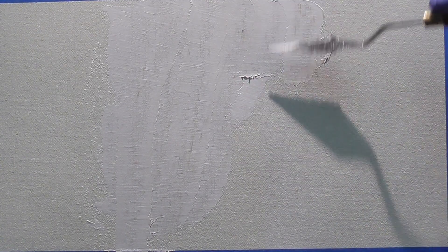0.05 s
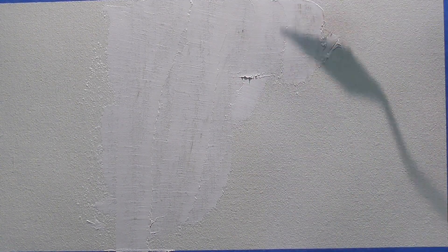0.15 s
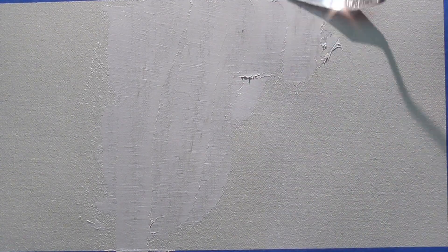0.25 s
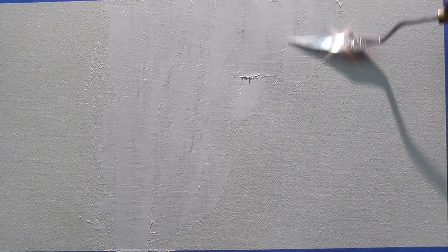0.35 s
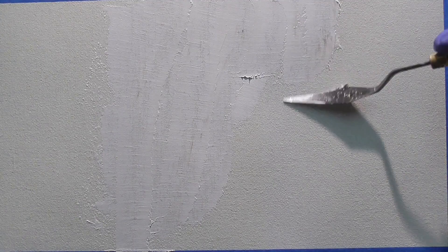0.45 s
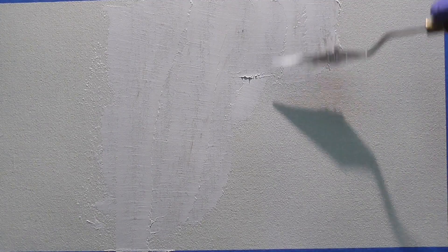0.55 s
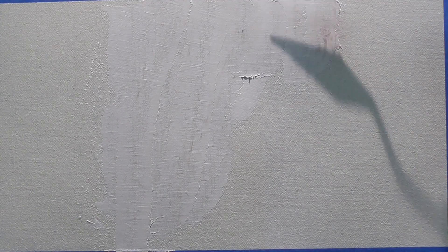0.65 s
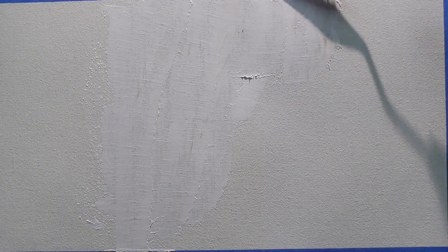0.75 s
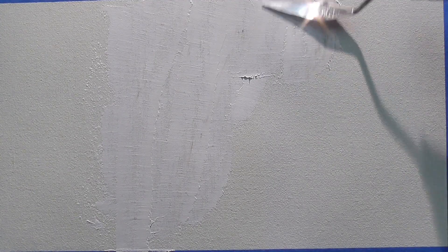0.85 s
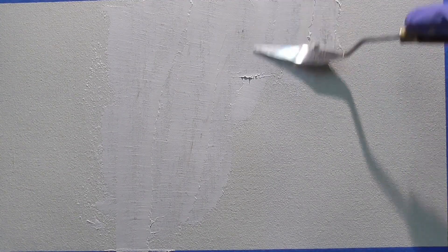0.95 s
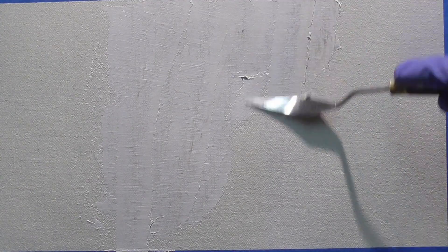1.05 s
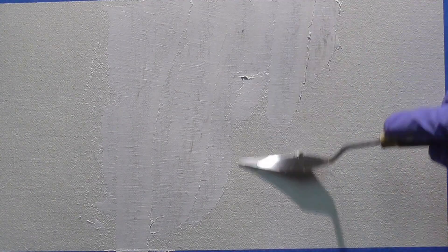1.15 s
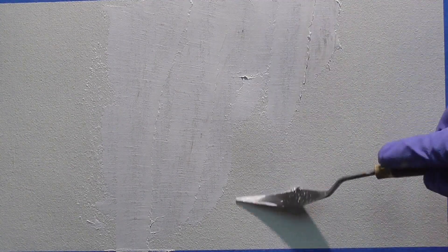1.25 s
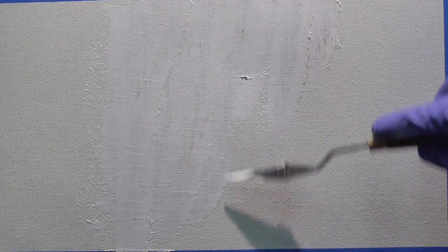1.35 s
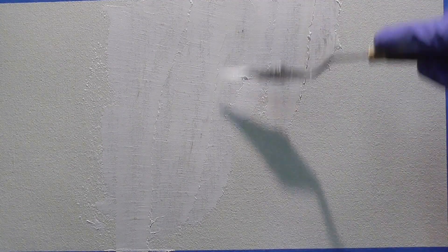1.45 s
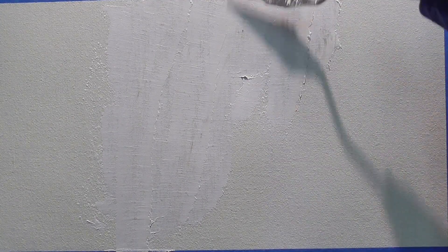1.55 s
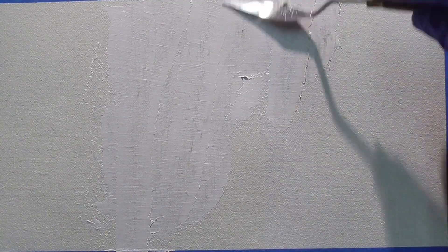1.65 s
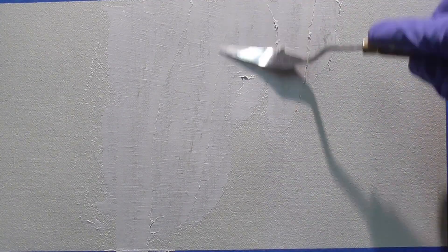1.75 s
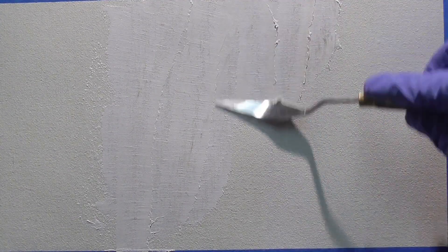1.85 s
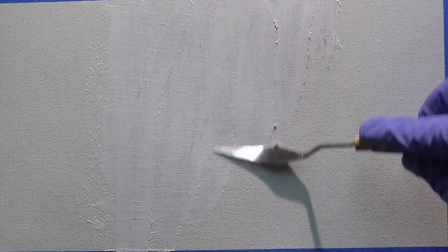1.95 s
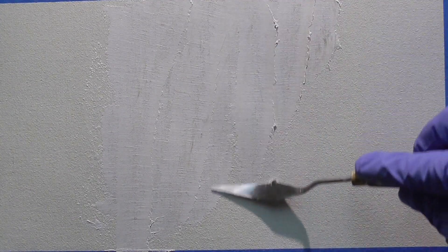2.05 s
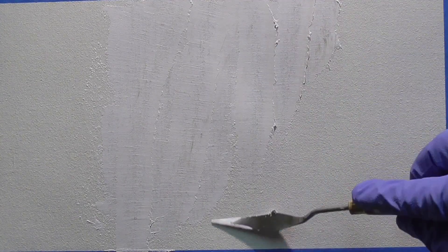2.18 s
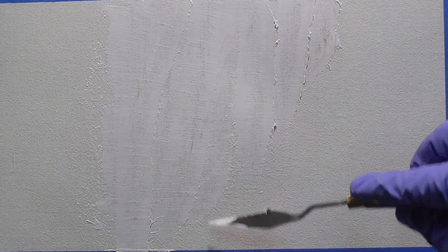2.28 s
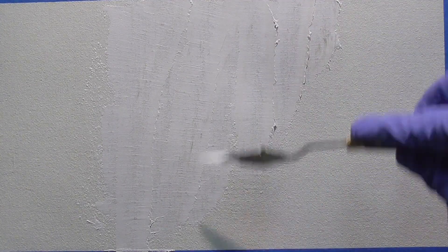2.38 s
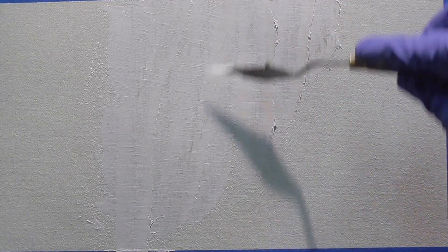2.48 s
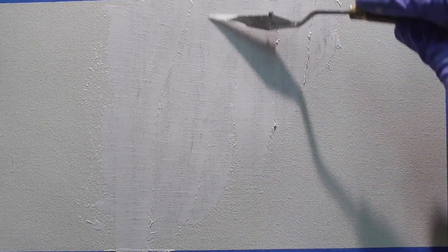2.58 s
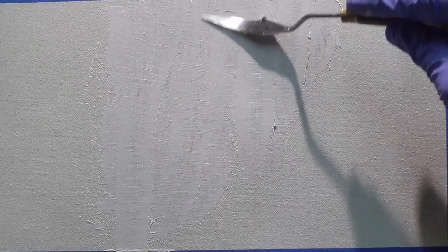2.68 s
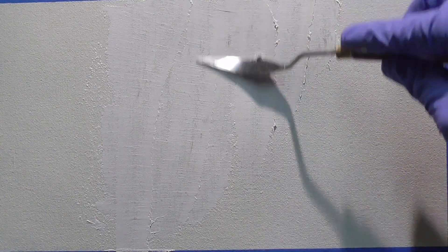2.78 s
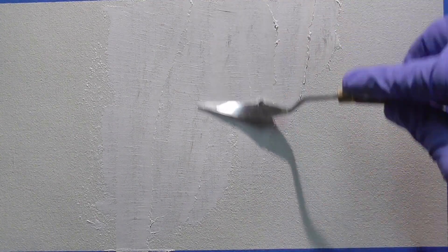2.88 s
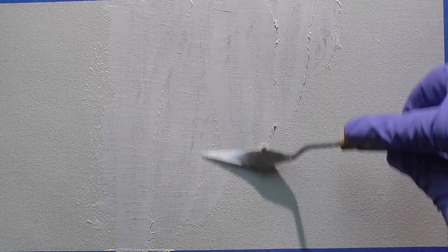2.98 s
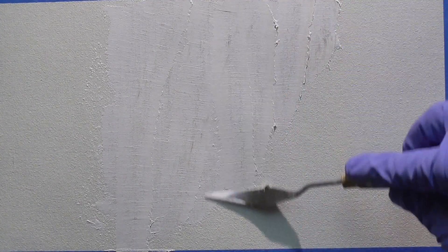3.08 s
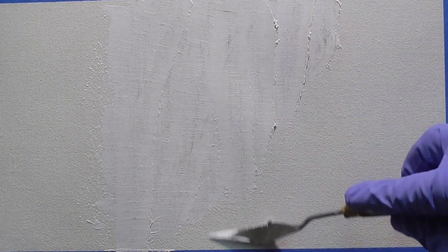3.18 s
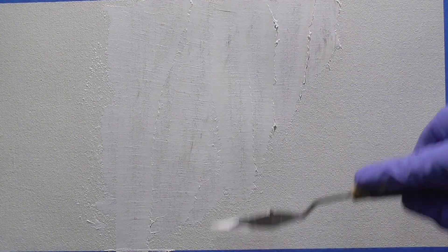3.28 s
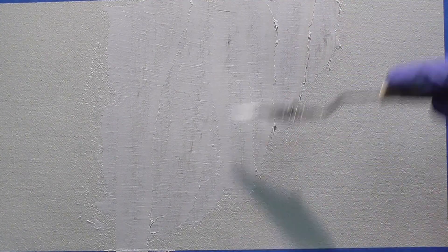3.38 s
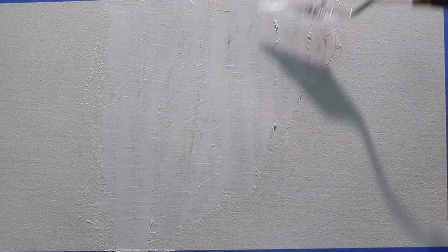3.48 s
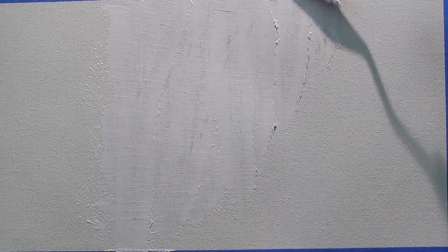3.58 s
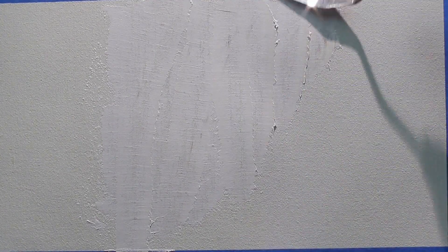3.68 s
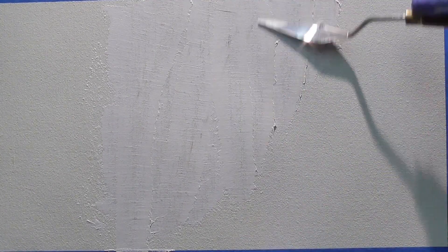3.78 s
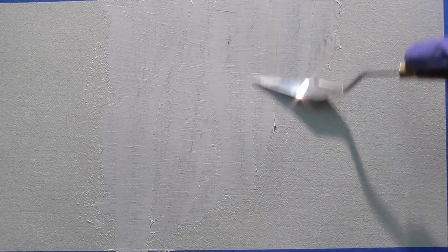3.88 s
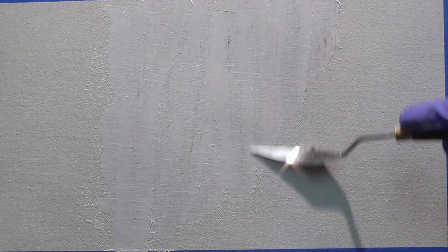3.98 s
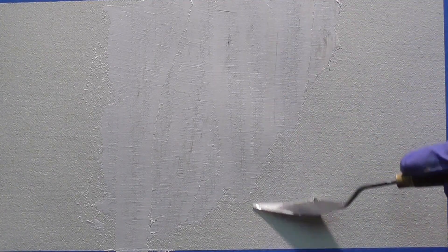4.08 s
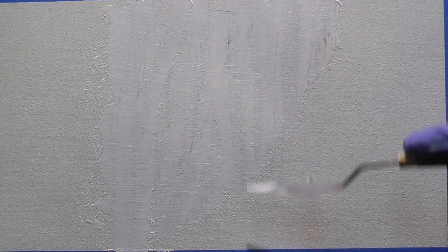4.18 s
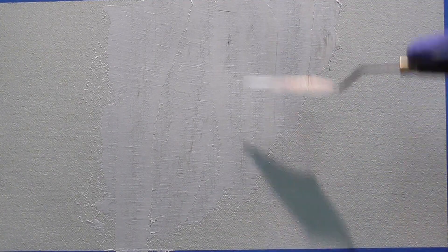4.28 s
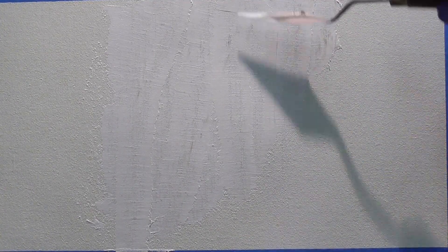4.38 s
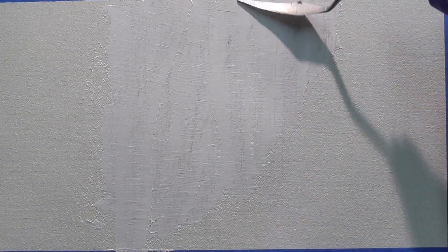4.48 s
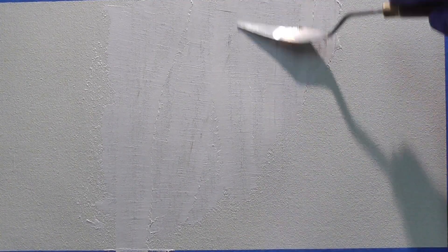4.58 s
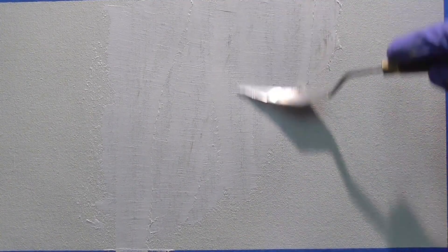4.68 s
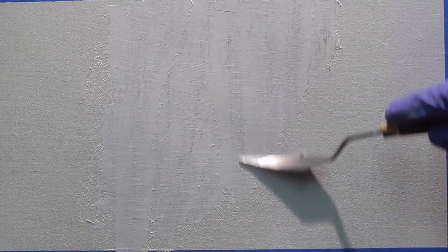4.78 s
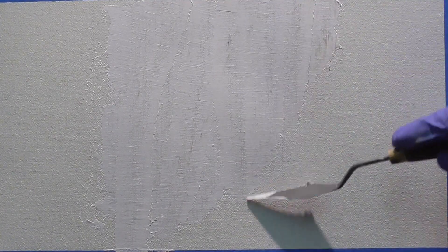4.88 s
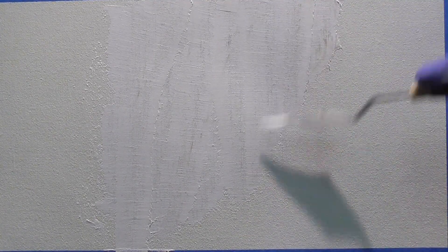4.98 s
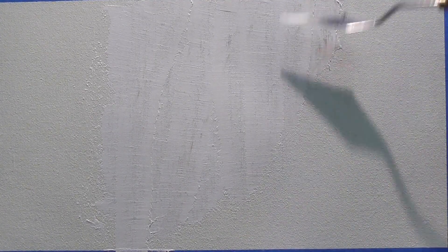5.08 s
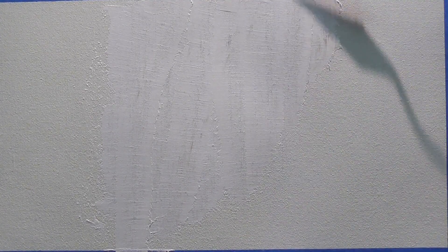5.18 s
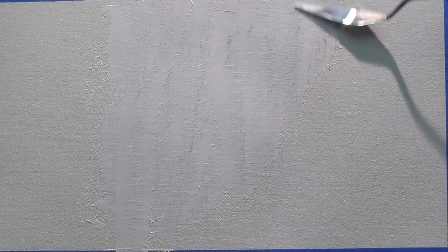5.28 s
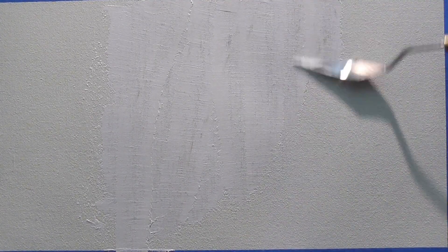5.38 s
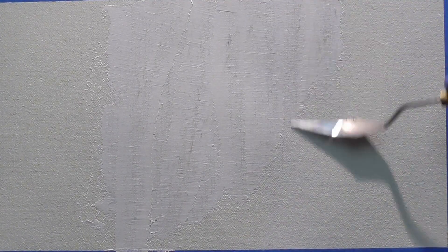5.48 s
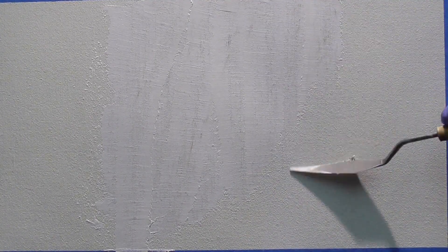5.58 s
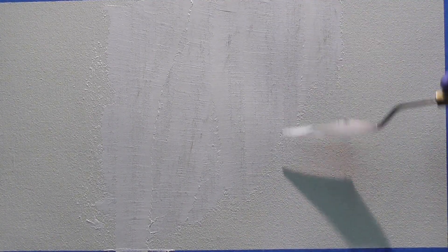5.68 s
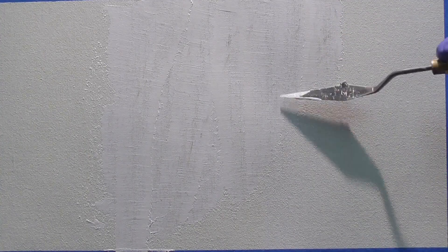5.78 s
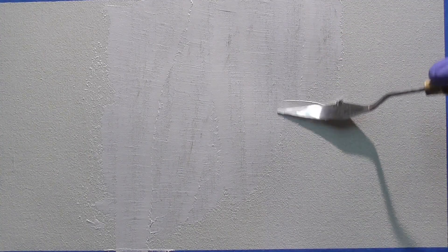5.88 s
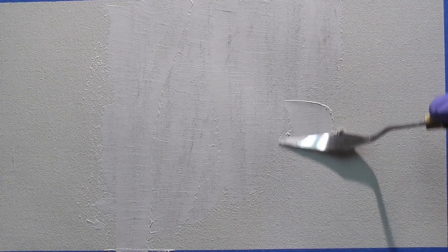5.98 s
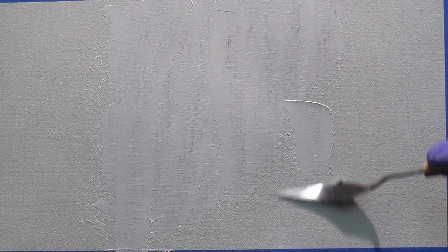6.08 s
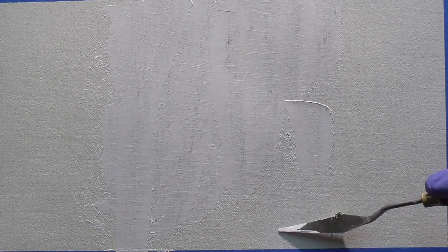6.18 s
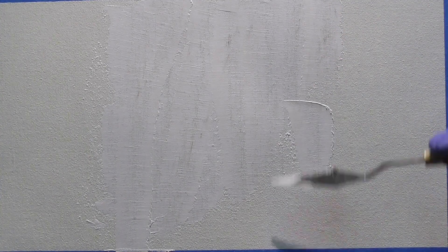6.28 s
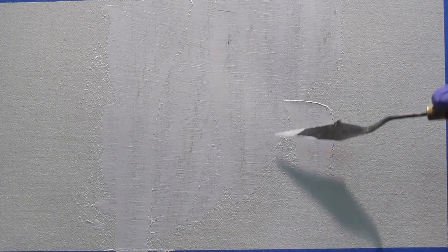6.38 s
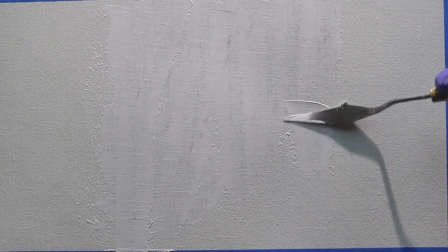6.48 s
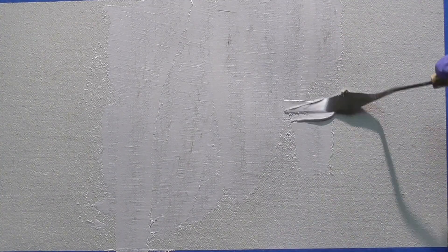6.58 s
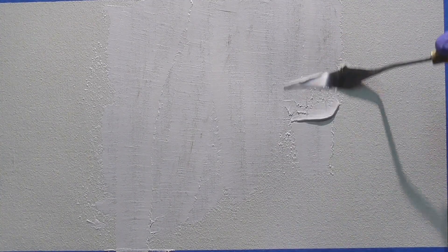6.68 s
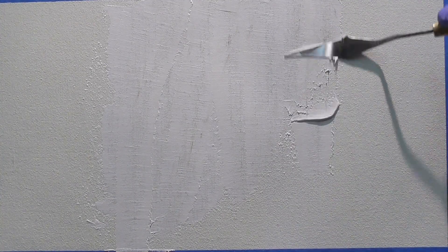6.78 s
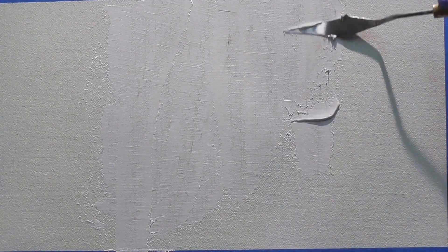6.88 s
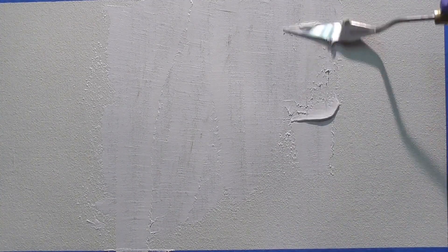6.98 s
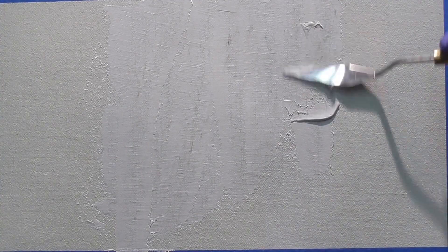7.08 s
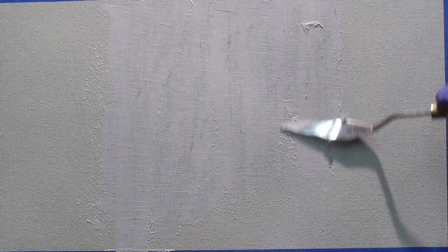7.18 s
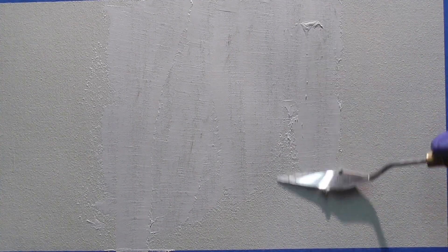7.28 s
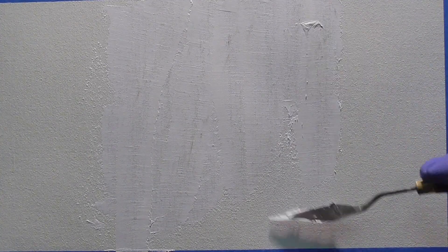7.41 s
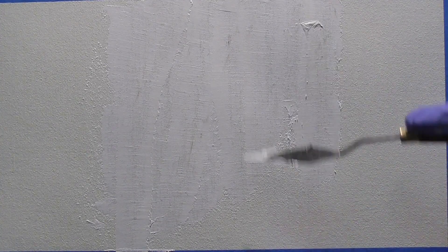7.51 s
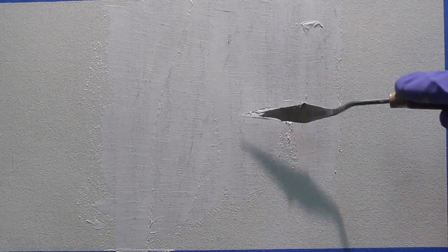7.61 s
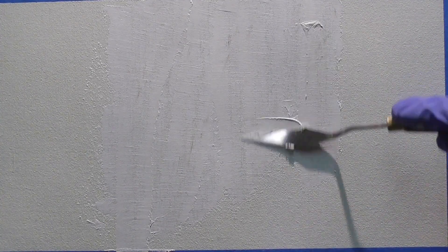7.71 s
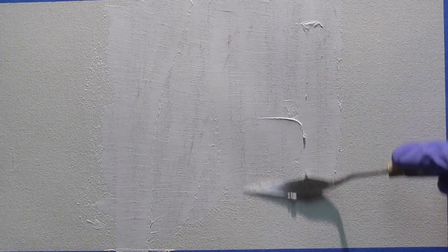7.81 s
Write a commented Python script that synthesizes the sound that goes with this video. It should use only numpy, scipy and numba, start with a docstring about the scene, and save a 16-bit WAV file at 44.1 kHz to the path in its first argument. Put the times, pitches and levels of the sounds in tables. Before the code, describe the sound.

Close to a phone microphone in a quiet, slightly humming room, a thin steel knife scrapes taut canvas in short strokes. A light scrape opens, then a tick and a quicker rasp follow at 0.4-0.7 s. From 1.0 to 1.5 s a stroke grows from gritty drag to bright sizzle, with loud snaps at 1.3 and 1.4. Slower, hollow drumming rasps run at 1.85-2.45 and 2.8-3.4 s, with thin steel singing and small cracks in the first. After faint contact near 3.6, faster, hissier swipes come at 3.9-4.3, 4.7-5.1 and 5.5-5.8 s, the last with two sharp cracks near 5.7. Another swish at 6.1-6.4 leads to weak ticks and faint scuffs around 6.6-7.1. A final firm scrape spans 7.2-7.6, then a small tick at 7.84. Short diffuse echo, soft hiss between strokes.

```python
"""A steel palette knife is dragged in short strokes over a stretched canvas, close to a phone.
Random jolts from the weave drum the canvas and rasp in the blade; faster strokes sizzle more brightly.
The blade's tip ticks as it lands, lumps of paint snap off with a crack, and some moments sing.
Jolts and noise drive resonances; filtered noise makes the quiet room and its short echo."""
import sys
import numpy as np
from scipy import signal
from scipy.fft import rfft, irfft
from scipy.io import wavfile
from scipy.ndimage import uniform_filter1d
from numba import njit

SR = 44100
rng = np.random.default_rng(int(sys.argv[2]) if len(sys.argv) > 2 else 0)


def transcribe(signal):
    """Save signal, clipped to [-1, 1], as a 16-bit WAV file at the path in sys.argv[1]."""
    frames = np.atleast_2d(signal).T
    limited = np.clip(frames, -1, 1)
    pcm = np.round(limited * 32767).astype(np.int16)
    wavfile.write(sys.argv[1], SR, pcm)


N = 346185
TIME = np.arange(N) / SR
SIDES = np.array([[1], [-1]])  # left and right get the side signal with opposite signs


def undb(db):
    """Turn decibels into an amplitude factor."""
    return 10 ** (np.asarray(db) / 20)


def unit(x):
    """Scale to an average (RMS) level of 1."""
    return x / np.sqrt(np.mean(x ** 2))


def pan(x, left_db):
    """Make the left channel left_db louder than the right."""
    return x * undb(left_db * SIDES / 2)


def walk(rate):
    """Random levels held for 1 / rate seconds and smoothed twice; spread near 1."""
    hold = int(SR / rate)
    steps = np.repeat(rng.standard_normal(N // hold + 1), hold)
    smooth = uniform_filter1d(uniform_filter1d(steps, hold), hold)
    return 1.55 * smooth[:N]


@njit
def svf(x, hz, width):
    """State-variable band-pass: a resonance with a moving centre, gain 1 at the centre."""
    y, band, low = np.empty(len(x)), 0., 0.
    for i in range(len(x)):
        g, damping = np.tan(np.pi * hz[i] / SR), width / hz[i]
        v = (band + g * (x[i] - low)) / (1 + g * (g + damping))
        band, low = 2 * v - band, low + 2 * g * v
        y[i] = damping * v
    return y


def ring(force, modes, drift, patchy_db, rate, spread_db=0):
    """Force drives modes whose pitch and strength wander as the contact point moves."""
    out = 0
    for k, (hz, width, db) in enumerate(modes):
        centre = hz * (1 + drift * walk(rate))
        # spread_db is the change per octave away from 4500 Hz
        gain = undb(db + patchy_db * walk(rate) + spread_db * abs(np.log2(hz / 4500)))
        mode = np.array([svf(f, centre, float(width)) for f in force])
        out = out + (-1) ** k * gain * mode  # neighbours have opposite signs
    return out


def jolts(rate, spread_db, power_fall_s):
    """Strength of the drag: threads caught at random with uneven force, each let go quickly."""
    uneven_db = spread_db * np.minimum(rng.exponential(size=N), np.e)
    caught = (rng.random(N) < rate / SR) * undb(uneven_db)
    power = signal.lfilter([1], [1, -np.exp(-1 / (power_fall_s * SR))], caught ** 2)
    return np.sqrt(power + 1e-9)


def two_ports(strength, alike):
    """Rough force as two microphone ports hear it, from partly different parts of the edge."""
    mid, side = rng.standard_normal((2, N))
    return unit(strength * (np.sqrt(1 + alike) * mid + np.sqrt(1 - alike) * side * SIDES))


def crack(hz, wide, fall_s, tail, tail_s):
    """A burst of noise around hz with a fainter tail, partly different at the two ports; peak 1."""
    t = np.arange(SR // 16) / SR
    grit = rng.standard_normal((3, len(t)))
    edges_hz = [hz / wide, min(hz * wide, .45 * SR)]
    band = signal.butter(2, edges_hz, "band", fs=SR, output="sos")
    fade = np.exp(-t / fall_s) + tail * np.exp(-t / tail_s)
    burst = signal.sosfilt(band, grit[0] + .5 * grit[1:]) * fade
    burst *= np.minimum(t / 0.00087, 1)
    return burst / np.max(np.abs(burst))


def room():
    """Steady noise of the quiet room: shaped noise, less alike at the ports in the treble."""
    # the colour of the room noise: pitch_hz, density_db (relative dB per Hz)
    colour = np.array([(15, -24.5), (90, -10), (220, -3.5), (600, -13.5), (900, -15), (1200, -7.5),
                       (1700, -19.5), (2700, -26), (4000, -27.5), (6500, -28.5), (10500, -23.5),
                       (15500, -29)])
    hz = np.maximum(np.arange(N // 2 + 1) * SR / N, 1)
    shape = undb(np.interp(np.log(hz), np.log(colour[:, 0]), colour[:, 1]))
    apart = np.clip(0.13 + hz / 8000, 0, 1)
    mid, side = irfft(rfft(rng.standard_normal((2, N))) * [shape, shape * apart], N)
    level_db = -69.5 + walk(2.1)
    return pan(unit(mid + side * SIDES), -2.9) * undb(level_db)


def walls(x, t60_s, db):
    """Short diffuse echo: fading noise, shared by the ports in the bass, different in the treble."""
    t = np.arange(SR // 3) / SR
    shared, apart = rng.standard_normal((2, len(t)))
    treble = signal.butter(1, 2500, "high", fs=SR, output="sos")
    apart = signal.sosfilt(treble, apart)
    fade = 1000. ** (-t / t60_s) * np.minimum(t / .003, 1)
    tail = (shared + 1.5 * apart * SIDES) * fade
    size = np.sqrt(np.sum(shared ** 2 * 1.6e6 ** (-t / t60_s)))
    return undb(db) * signal.fftconvolve(x, tail / size, axes=1)[:, :N]


def ticks():
    """Landings click, ring the tip and push the cloth (returned as a force); snags only crack."""
    # blade landings: start_s, tick_db (relative), tip_ring_hz, thump_db (push relative to the tick),
    # ring_share (0-1, the rest is click)
    landings = [(0.4056, -45, 3470, -14, 0.4), (0.9525, -39, 3650, -8, 0.57),
                (1.7726, -35.5, 3850, -0.5, 0.46), (2.7911, -34.5, 3520, -14.5, 0.37),
                (3.616, -55.5, 2800, -8.5, 0.16), (3.7974, -47.5, 4280, -16, 0.35),
                (4.653, -43.5, 2480, 18.5, 0.2), (4.666, -47, 4240, 3, 0.1), (5.409, -58.5, 3340, 13, 0.37),
                (6.03, -56, 3000, 0, 0.1), (6.1001, -47.5, 2160, 16, 0.2), (6.6177, -47, 2570, 7, 0.24),
                (6.6382, -50.5, 2620, -3, 0.5), (7.8412, -47.5, 1934, -18, 0.46)]
    # lumps of paint snapping off the edge: start_s, peak_db (before panning), centre_hz
    snags = [(0.161, -36, 3000), (0.699, -40.5, 3560), (1.326, -14, 4300), (1.4036, -19, 3800),
             (1.496, -34, 4470), (1.523, -37, 4410), (2.344, -29, 4670), (2.433, -33.5, 3660),
             (5.699, -16, 4530), (5.7257, -14.5, 7610)]
    tip, push, t = np.zeros((2, N + SR)), np.zeros(N + SR), np.arange(SR // 16) / SR
    for s, db, hz, thump_db, share in landings:
        i = int(s * SR)
        fade = (t / 0.00067) * (np.exp(-t / 0.00083) + 0.018 * np.exp(-t / 0.006))
        tone = np.sin(2 * np.pi * hz * t) * fade
        click = crack(1670, 2.96, 0.0038, 0.31, 0.024)
        tip[:, i:i + len(t)] += undb(db) * (3.85 * share * tone + (1 - share) * click)
        # the flexing blade presses for a few milliseconds
        push[i:i + len(t)] += undb(db + thump_db) * (t / 0.0012) * np.exp(-t / 0.0011)
    for s, db, hz in snags:
        i = int(s * SR)
        tip[:, i:i + len(t)] += undb(db) * crack(hz, 1.9, .002, .1, .008)
    return tip[:, :N], push[:N]


def canvas(drum_db, upper_db, push):
    """The stretched cloth resonates: it drums under the dragging edge and thumps on landings."""
    # lower and upper canvas resonances: pitch_hz, width_hz, level_db (relative)
    low_modes = [(82.6, 59, -25), (135, 30, -8), (203.9, 15.8, 2.5), (238.5, 33.2, -4.5), (278.5, 35, -9),
                 (350.8, 37, -13.5), (374, 18, -10), (427, 70, -18)]
    high_modes = [(479.8, 24, -3.5), (607.2, 18.2, 2.5), (737, 59, -15.5), (799, 32, -9), (978, 84, -14.5),
                  (1077, 42, -12.5), (1390, 280, -26)]
    force = two_ports(jolts(500, 2.5, 0.0036), 0.89)
    low = unit(ring(force, low_modes, .008, 1.68, 9)) * undb(drum_db)
    high = unit(ring(force, high_modes, 0.0026, 2.9, 9)) * undb(upper_db)
    thump = undb(16.5) * ring([push], low_modes + high_modes, 0.0051, 2.5, 3.07)
    return pan(low, -4.5) + pan(high, -3.0) + pan(thump, -2.5)


def singing(force, sharpness):
    """Free steel sings while the edge chatters evenly: gliding resonances swell in and out."""
    # sung notes: start_s, end_s, start_hz, end_hz, level_db (relative to the blade's broad modes)
    notes = [(0.023, 0.152, 4420, 4340, 1), (0.46, 0.61, 4200, 4600, -0.5), (1.045, 1.158, 3770, 4200, 1.5),
             (1.192, 1.277, 6800, 7050, -13), (1.953, 2.23, 2040, 2020, 1), (1.98, 2.19, 7100, 7160, -12.5),
             (2.03, 2.19, 3420, 3500, -13), (2.22, 2.367, 7100, 7250, -1.5), (3.066, 3.18, 3300, 3440, -5),
             (3.07, 3.296, 7800, 7130, -7.5), (4.137, 4.24, 4780, 4400, -3.5),
             (5.657, 5.696, 5200, 5430, 0), (6.12, 6.23, 2180, 2600, 0), (7.165, 7.277, 4500, 4240, 0)]
    out = np.zeros((2, N))
    for start, end, start_hz, end_hz, db in notes:
        i, j = int(start * SR), int(end * SR)
        glide = np.linspace(start_hz, end_hz, j - i)
        tone = np.array([svf(f, glide, end_hz / sharpness) for f in force[:, i:j].copy()])
        out[:, i:j] += undb(db) * unit(tone) * np.sqrt(np.hanning(j - i))
    return out


def blade(rasp_db, sizzle_db):
    """Jolts rasp in the steel and sizzle at its edge; speed widens the sizzle, drowns narrow modes."""
    # resonances, each with pitch_hz, width_hz, level_db (relative):
    # blade damped by paint and cloth, its edge, and narrow blade modes that come and go
    body_modes = [(1995, 790, -8.5), (2576, 470, -2.5), (3080, 640, -3), (4140, 1160, -3.5),
                  (4773, 660, -4)]
    edge_modes = [(5240, 1200, -2), (6260, 780, 0), (6790, 1100, 1.5), (9100, 2600, -3),
                  (11030, 2300, -6.5), (13500, 2200, -19.5)]
    narrow_modes = [(1917, 44, 5), (2160, 110, -7), (2620, 42, 0), (3150, 100, 2), (3510, 160, 1),
                    (4180, 120, -7), (4960, 72, -6)]
    strength = jolts(3000, 2.4, 0.00094) * undb(walk(40))  # ridges in the paint
    slow = np.clip((rasp_db - sizzle_db) / 20, 0, 1)  # 1 when the stroke is slow
    force = two_ports(strength, 0.89)
    streaks = unit(ring(force, narrow_modes, .012, 5, 12))
    body = unit(ring(force, body_modes, .02, 1.3, 10))
    rasp = body + streaks * undb(-11.5 + 4.1 * slow) + singing(force, 22)
    edge_force = two_ports(strength, 0.52)
    sizzle = ring(edge_force, edge_modes, 0.072, 1.2 + 1.5 * slow, 9.3, spread_db=-11 * slow)
    return pan(rasp, -.6) * undb(rasp_db) + pan(sizzle, -0.73) * undb(sizzle_db + 10.5)


def controls():
    """Pressure and speed set four levels; the blade settles in before a course and lifts after it."""
    # strokes: tilt_db (blade tilt, added to the rasp), place_db (place on the cloth, for upper modes),
    # course [time_s, pressure_db (drumming level), speed_db (relative sizzle level)]
    strokes = [(0.5, 1, [(.01, -41, -65), (.09, -35.5, -52), (.175, -40.5, -61.5)]),
               (1, 0, [(.43, -62, -83), (.455, -59, -81), (.48, -39.5, -65), (.585, -42.5, -50),
               (.641, -39.5, -37.5), (.68, -44.5, -56.5)]), (0, 3.5, [(.99, -62, -81), (1.03, -56, -76),
               (1.055, -41, -68.5), (1.157, -40, -66), (1.266, -31.5, -48.5), (1.325, -28, -30),
               (1.447, -33, -35.5), (1.49, -35, -50)]), (-0.5, 6, [(1.846, -47, -66.5), (1.916, -48, -70),
               (2.015, -34, -60), (2.205, -28.5, -57.5), (2.29, -29, -55), (2.356, -30.5, -47.5),
               (2.444, -46, -58)]), (0, -0.5, [(2.824, -46.5, -82), (2.863, -61.5, -80.5),
               (3.003, -37, -65), (3.263, -29.5, -54.5), (3.32, -32.5, -52), (3.35, -27.5, -40.5),
               (3.382, -31.5, -38), (3.425, -40.5, -40.5)]), (-7, 3, [(3.62, -62, -81.5),
               (3.74, -75.5, -89.5)]), (1, 1.5, [(3.83, -66, -82), (3.86, -57, -70), (3.88, -44, -59.5),
               (3.961, -30.5, -59), (4.112, -32, -37.5), (4.271, -30.5, -28.5), (4.329, -37, -41)]),
               (2, -2.5, [(4.679, -41.5, -92), (4.709, -56, -89), (4.758, -33.5, -54.5), (4.869, -32, -36),
               (5.039, -34, -36), (5.078, -42, -45)]), (1, -3, [(5.45, -56, -79), (5.488, -40, -57.5),
               (5.547, -35, -44.5), (5.677, -29.5, -26), (5.738, -28, -28), (5.797, -36, -45)]),
               (-1.5, 4, [(6.04, -62, -86), (6.085, -61.5, -81.5), (6.11, -49, -76), (6.206, -34.5, -60.5),
               (6.286, -29, -29), (6.356, -36, -36.5), (6.4, -47, -55.5)]), (-6, -9.5, [(6.644, -44, -69.5),
               (6.685, -55, -77), (6.79, -55.5, -79), (6.874, -57, -69), (6.94, -64.5, -75.5),
               (7.1, -74.5, -85)]), (0.5, 2.5, [(7.164, -64, -90), (7.214, -40, -64), (7.303, -30.5, -46.5),
               (7.39, -32, -46.5), (7.46, -31.5, -42), (7.523, -29, -32.5), (7.583, -33, -40)])]
    # rise before and fall after each course, in dB per second
    cloth_rise, cloth_fall, upper_fall = 589, 304, 332
    blade_rise, blade_fall = 400, 555
    level = np.full((4, N), -200.)
    for tilt_db, place_db, course in strokes:
        s, pressure, speed = np.transpose(course)
        early, late = np.maximum(s[0] - TIME, 0), np.maximum(TIME - s[-1], 0)
        pressure, speed = np.interp(TIME, s, pressure), np.interp(TIME, s, speed)
        cloth = cloth_rise * early + cloth_fall * late
        steel = blade_rise * early + blade_fall * late
        rasp = -5.5 + 0.17 * pressure + 0.66 * speed
        # the upper modes are fed by the press and by the fast chatter
        upper = 20 * np.log10(np.hypot(undb(pressure - 9.5), undb(speed + place_db)))
        upper = upper - cloth_rise * early - upper_fall * late
        # where strokes overlap, the louder one counts
        level = np.maximum(level, [rasp + tilt_db - steel, speed - steel, pressure - cloth, upper])
    return level


def scene():
    """Add canvas, blade and ticks, then their echo and the room."""
    rasp_db, sizzle_db, drum_db, upper_db = controls()
    tip, push = ticks()
    near = canvas(drum_db, upper_db, push) + blade(rasp_db, sizzle_db) + pan(tip, -2.2)
    return near + walls(near, 0.088, -8.5) + room()


def record(dry):
    """The phone thins the deep bass below 60 Hz and cuts the top above 15450 Hz."""
    thin = signal.sosfilt(signal.butter(1, 60, "high", fs=SR, output="sos"), dry)
    return signal.sosfilt(signal.ellip(10, .2, 80, 15450, fs=SR, output="sos"), thin)


dry = scene()
out = record(dry)
transcribe(out)
```